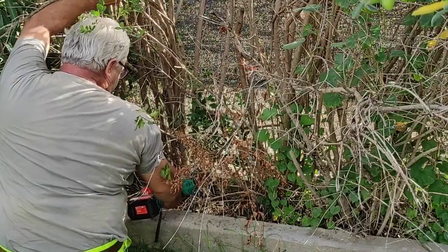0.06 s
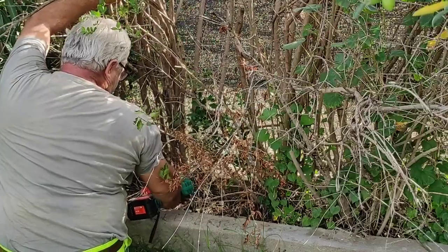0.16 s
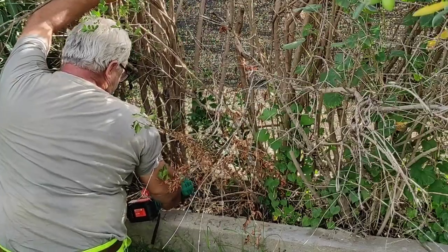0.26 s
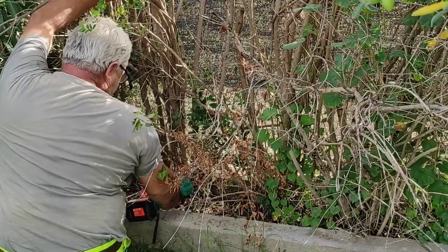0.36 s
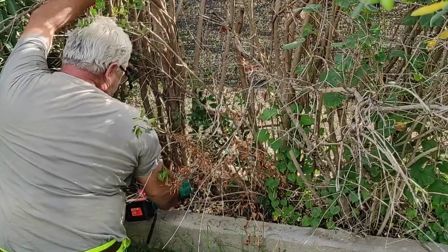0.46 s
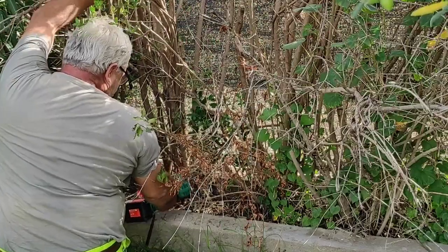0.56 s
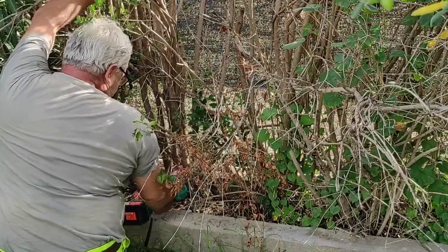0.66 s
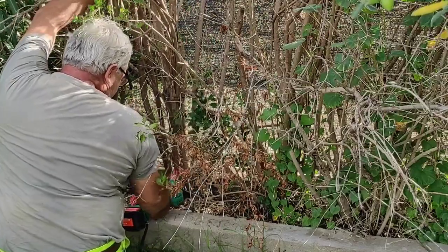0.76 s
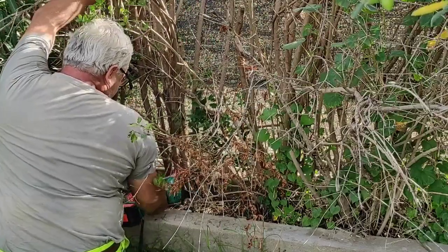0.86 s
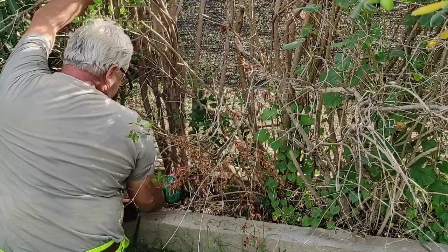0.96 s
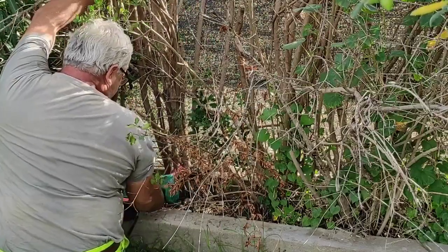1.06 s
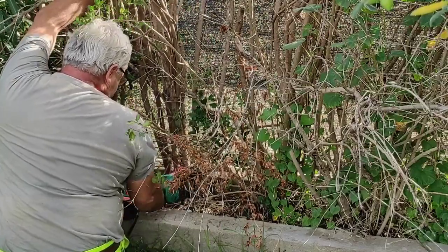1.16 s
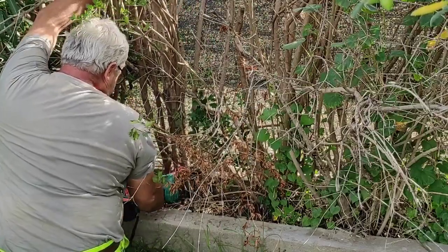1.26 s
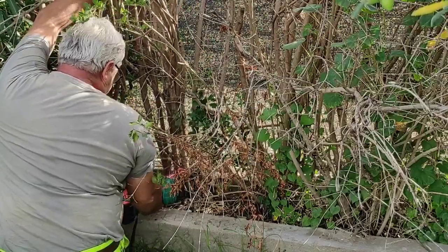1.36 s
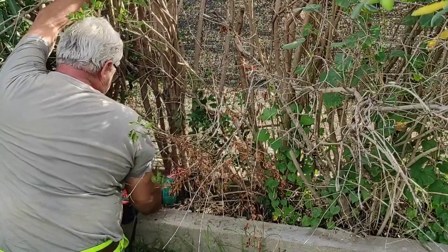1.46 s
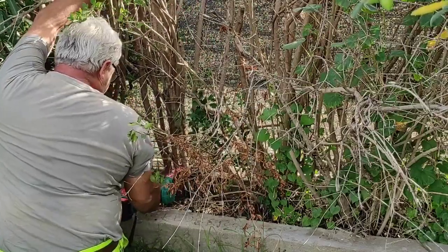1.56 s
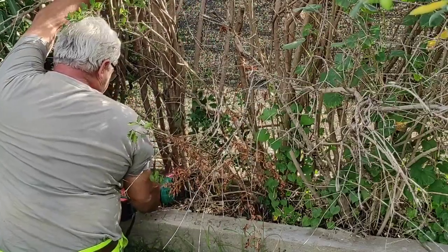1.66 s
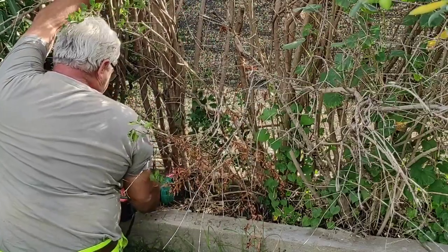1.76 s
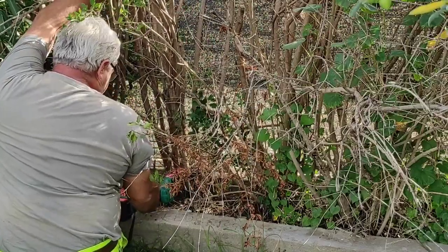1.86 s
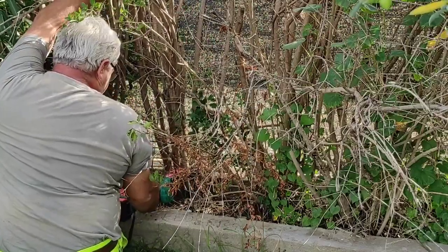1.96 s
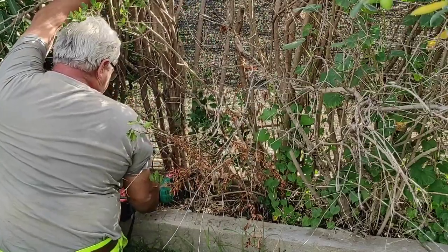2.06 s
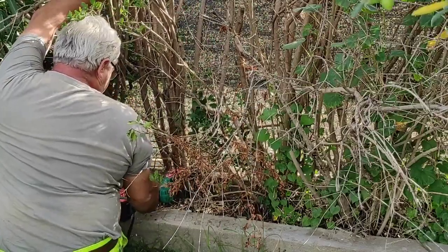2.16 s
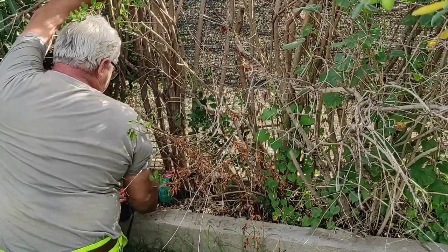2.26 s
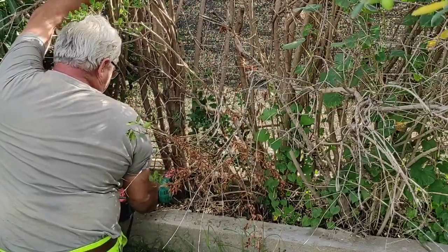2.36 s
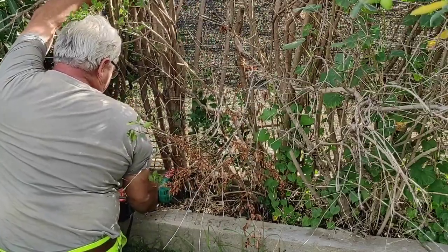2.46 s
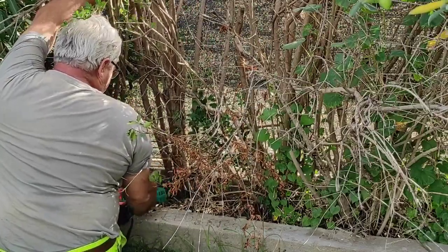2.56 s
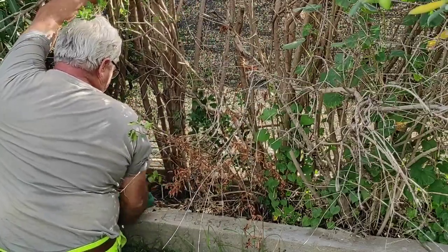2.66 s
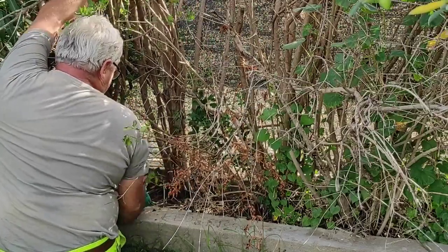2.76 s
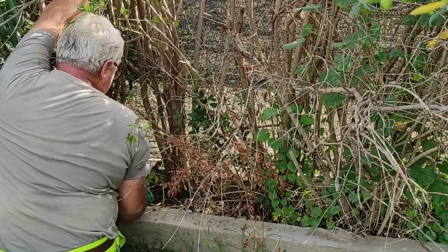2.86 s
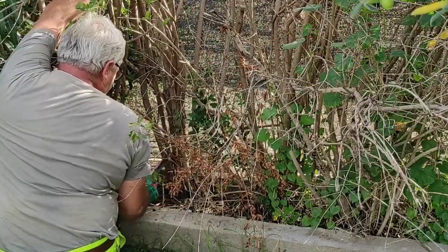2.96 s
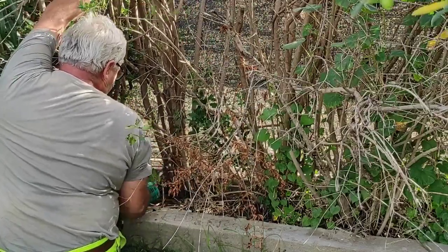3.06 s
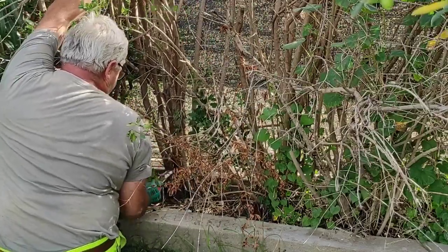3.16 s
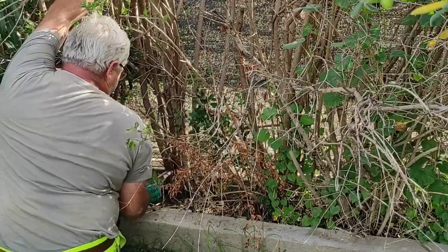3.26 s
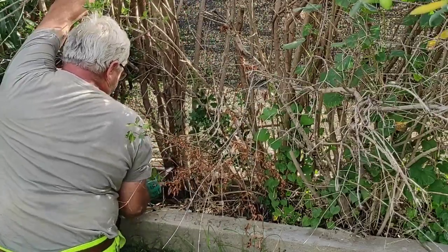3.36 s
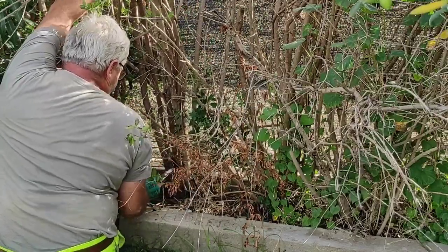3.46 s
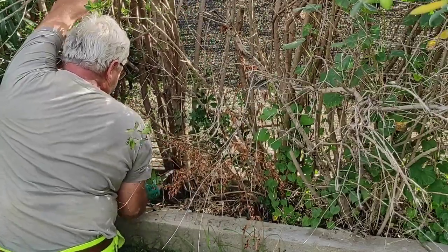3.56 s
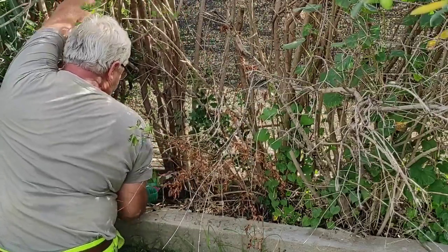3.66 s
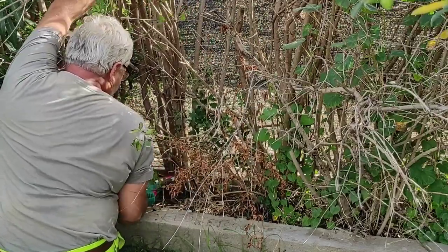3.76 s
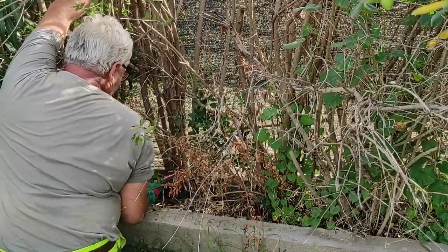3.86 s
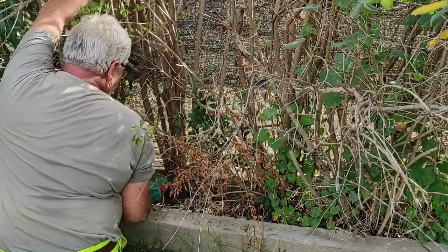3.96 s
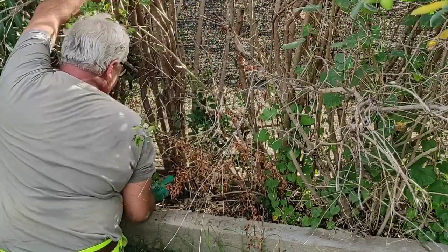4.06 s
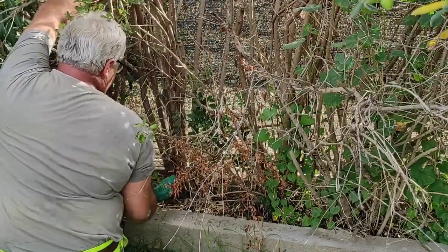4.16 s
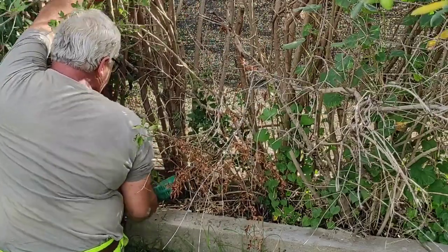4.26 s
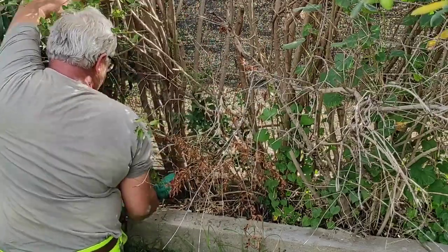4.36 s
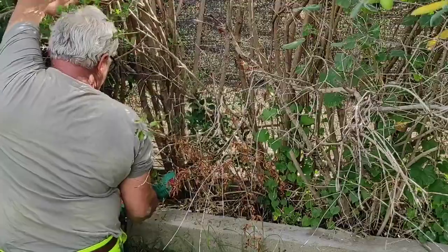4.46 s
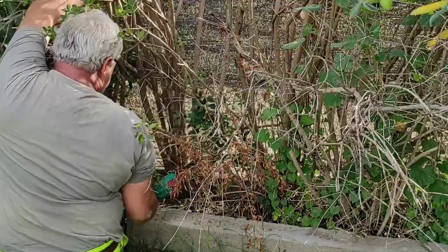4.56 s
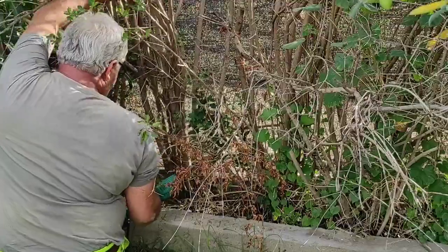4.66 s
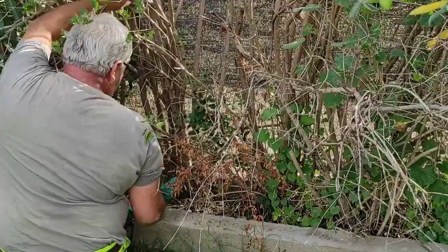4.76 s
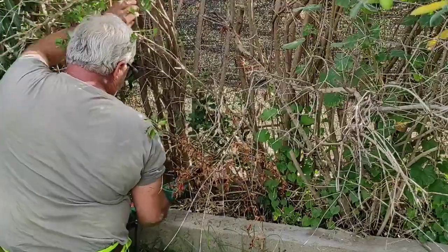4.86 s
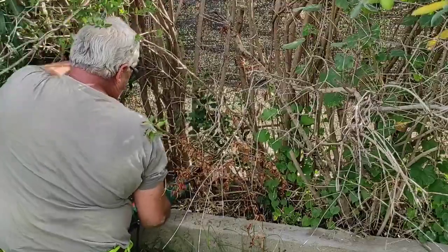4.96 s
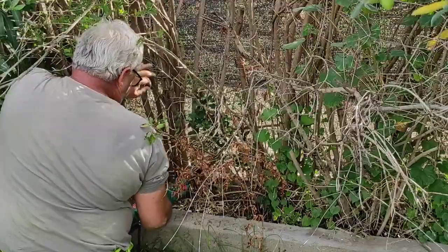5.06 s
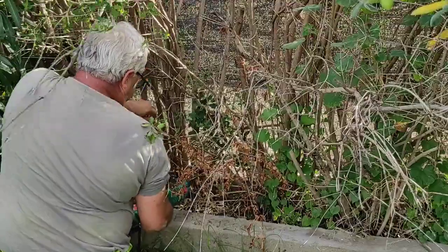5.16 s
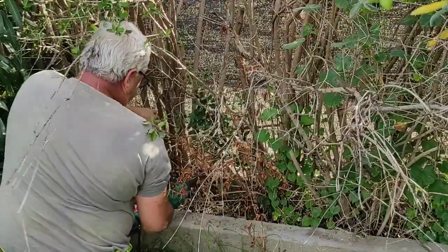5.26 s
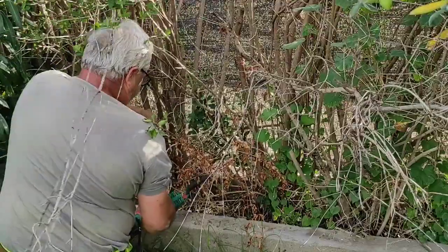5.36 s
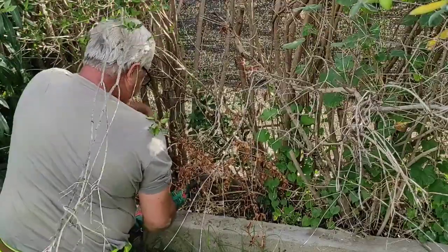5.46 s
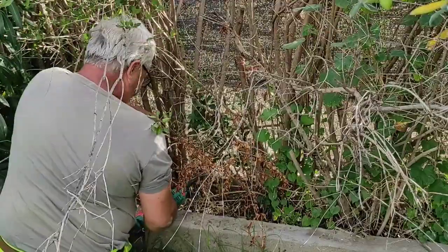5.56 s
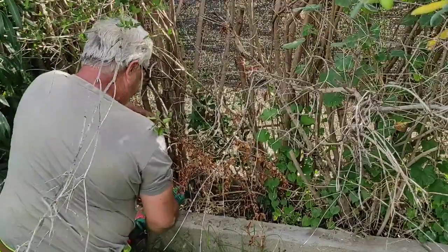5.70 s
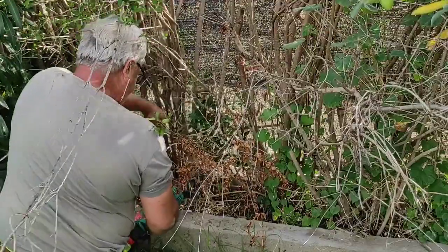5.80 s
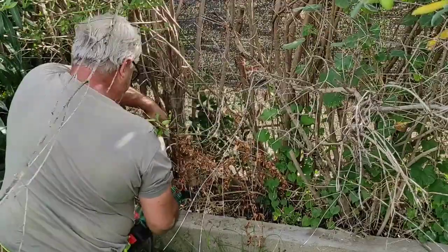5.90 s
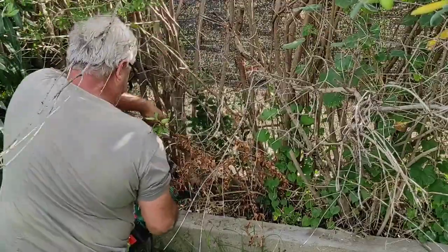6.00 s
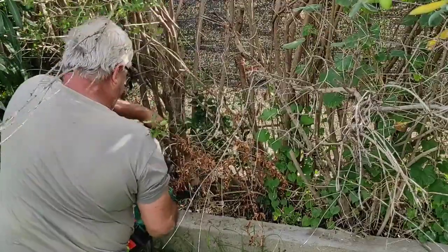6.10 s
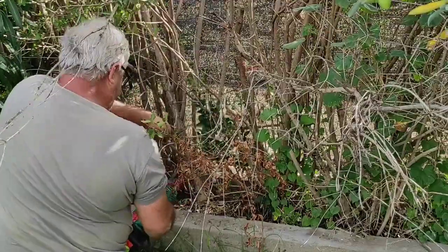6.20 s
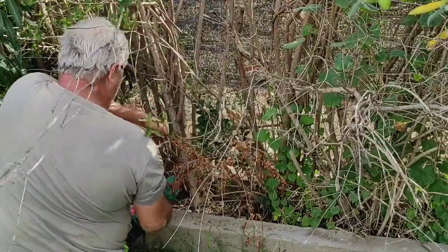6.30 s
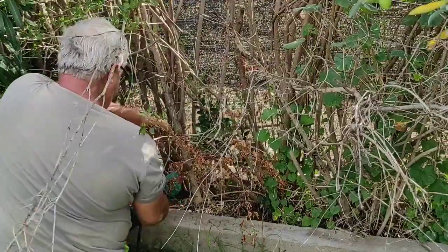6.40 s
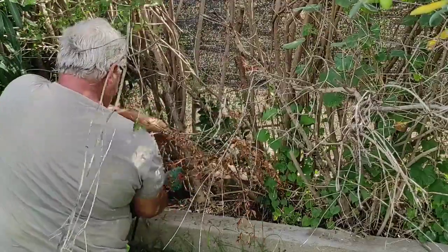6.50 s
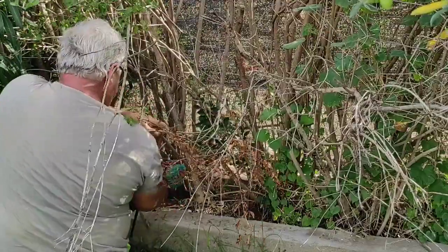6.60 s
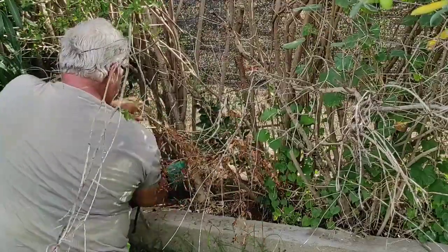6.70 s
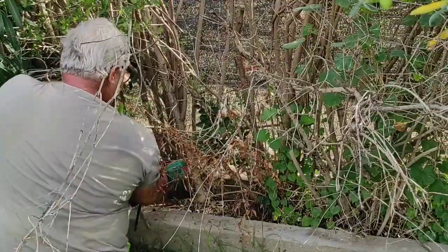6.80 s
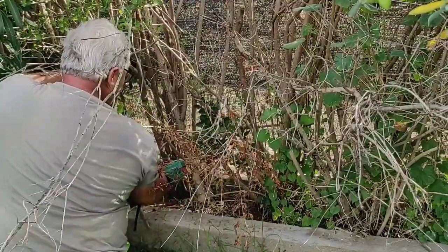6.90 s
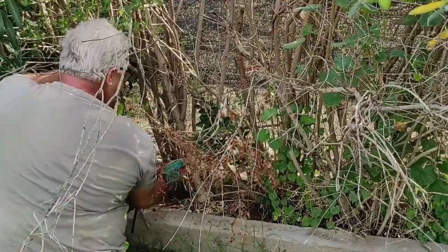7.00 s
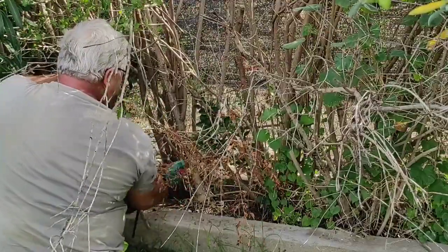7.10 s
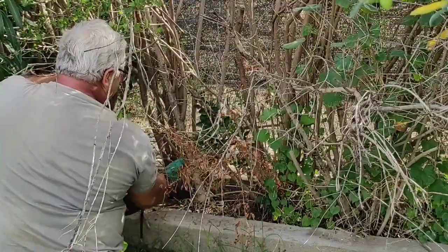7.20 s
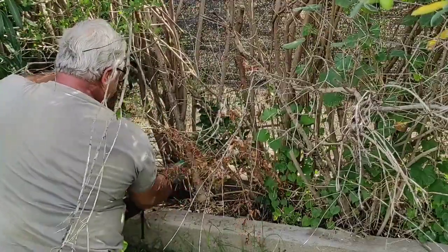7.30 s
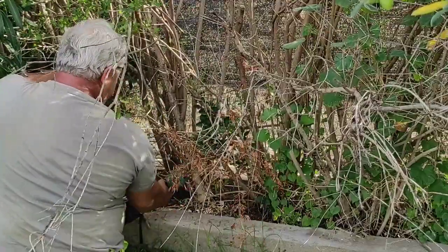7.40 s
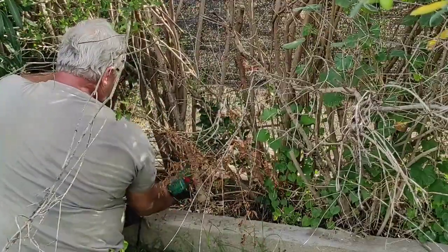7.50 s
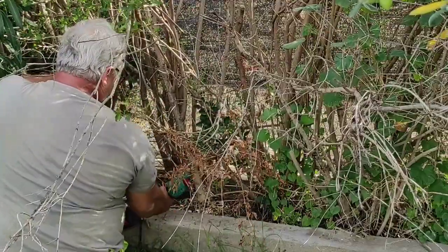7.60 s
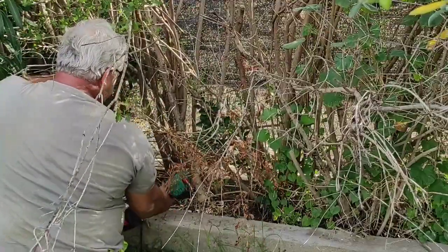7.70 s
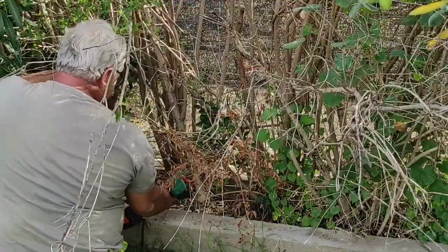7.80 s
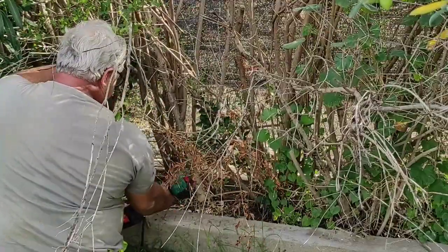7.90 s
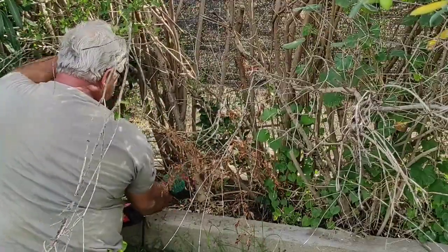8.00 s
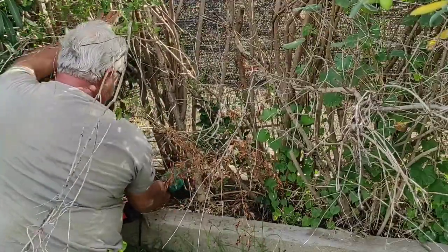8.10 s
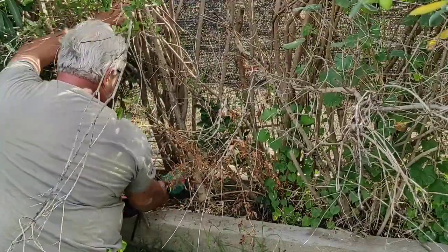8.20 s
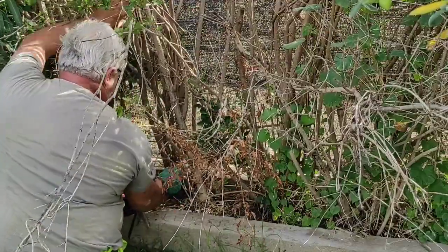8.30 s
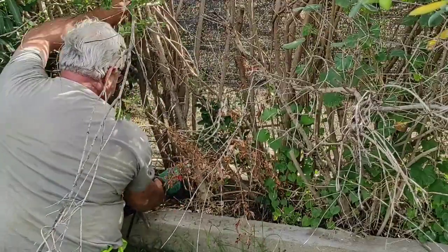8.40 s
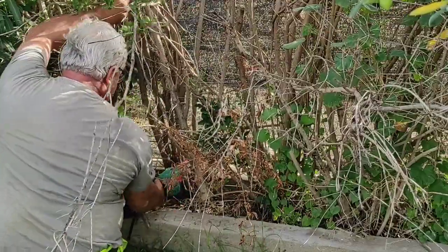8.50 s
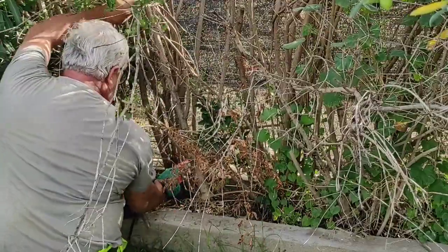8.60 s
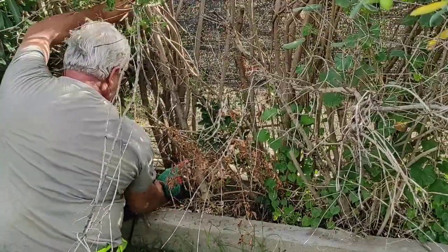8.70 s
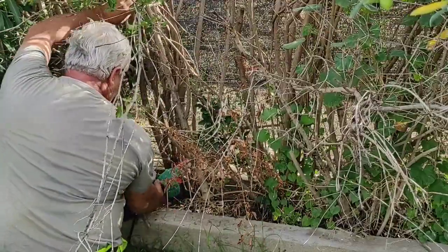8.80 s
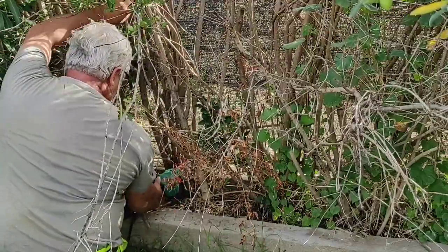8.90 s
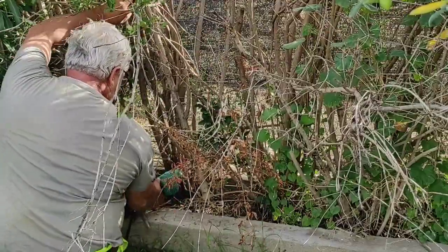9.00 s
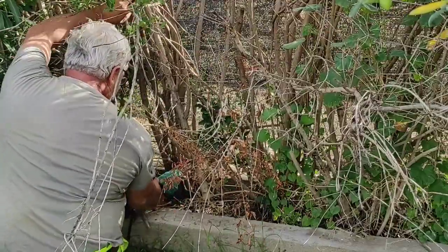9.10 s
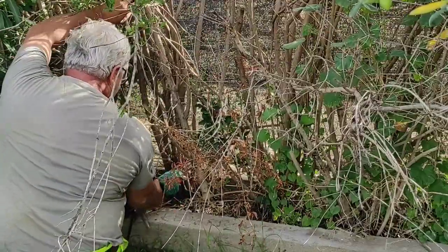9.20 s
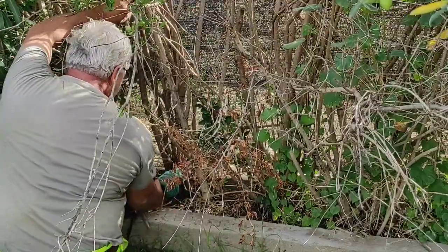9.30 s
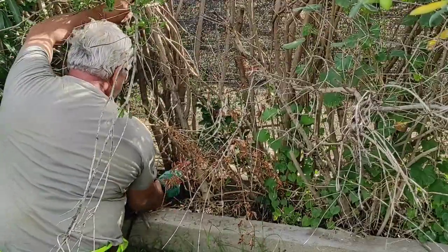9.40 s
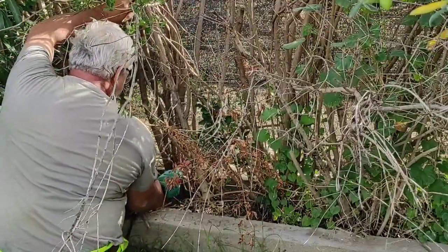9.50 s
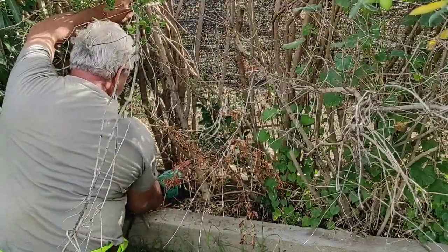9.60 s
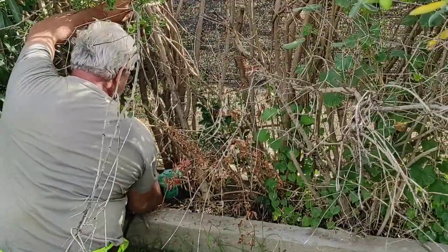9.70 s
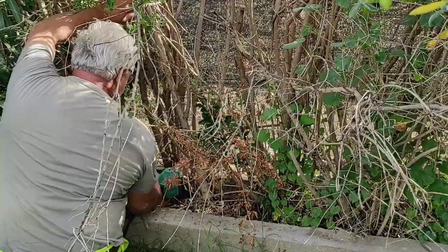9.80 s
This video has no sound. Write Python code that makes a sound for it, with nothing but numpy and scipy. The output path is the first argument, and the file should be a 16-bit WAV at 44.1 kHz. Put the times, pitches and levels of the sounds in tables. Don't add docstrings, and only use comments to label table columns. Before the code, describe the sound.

From 0 to 2.6 s a small battery chainsaw cuts a stem very close by: harsh, bright chain rattle, ringing plastic housing, wavering gear whine and rough wood tearing, with low throbs as it is pushed at the start, 0.5 and 2.3 s and brief dips when it slips. At 2.63 s it breaks through with clattering knocks, then runs free, thinner and smoother, until about 3.4 s, dropping quickly with ratcheting clicks and stopping by 4 s. From 4 to 9.7 s dry leaves rustle in flurries with scrapes, ticks, light knocks and twig snaps; the sharpest crack comes at 5.9 s, and handling thins after 8.7 s. Faint traffic, hum and soft breeze lie far beneath. At about 9.75 s clicks lead into the saw restarting, duller and cut short. The left is close, slightly distorted; the right is weak and muffled, with streaky gated gaps in the noise.

```python
import sys
import numpy as np
from scipy import signal
from scipy.fft import rfft, irfft, next_fast_len
from scipy.io import wavfile
from scipy.ndimage import uniform_filter1d

SR = 44100
rng = np.random.default_rng(int(sys.argv[2]) if len(sys.argv) > 2 else 0)


def level_to_linear(level):
    exponent = np.asarray(level, float) / 20
    return 10 ** exponent


def store_pcm(level_fs):
    pcm = np.round(np.clip(level_fs, -1, 1) * 32767).astype(np.int16)
    wavfile.write(sys.argv[1], SR, np.atleast_2d(pcm).T)


N = 434369

# start_s, links_per_s, gear_whine_db, load_roughness (0-1)
CHAIN_SPEED = [(0, 238, -26, 0.82), (.3, 237, -27, 0.8), (.45, 245, -31.5, 0.84), (.8, 206, -22.5, 0.64),
               (1.0, 260, -37, 0.59), (1.35, 225, -25.5, 0.69), (1.8, 210, -27, 0.85),
               (2.1, 210, -27.5, 0.74), (2.55, 214, -34.5, 0.67), (2.63, 254, -30.5, 0.45),
               (2.8, 283, -35, 0.15), (3.05, 275, -36, 0.06), (3.3, 296, -41, .2), (3.6, 114, -58, 0.57),
               (3.8, 47, -77, 0.6), (4.05, 10.4, -84, 0.36), (9.75, 28, -88, 0.32), (9.85, 150, -49, 0.61)]
# start_s, level_db
CHAIN_RUNS = [
    [(0, -10), (.46, -12), (.68, -9), (1.0, -14), (1.31, -12), (2.1, -10), (2.54, -11), (2.74, -20),
     (3.13, -19.5), (3.3, -21), (3.45, -24), (3.5, -28.5), (3.59, -26), (3.625, -35.5), (3.745, -37.5),
     (3.77, -42.5), (3.95, -49), (4.0, -61)],
    [(9.755, -80.5), (9.76, -50.5), (9.774, -43), (9.78, -35.5), (9.82, -32.5), (9.85, -29.5)],
]
HOUSING_RUN_DB = [-1, -4]
# pitch_hz, level_db (per Hz)
CHAIN_COLOUR = [(1650, -33.5), (2800, -7.5), (3230, -8.5), (4820, -5), (5250, -5.5), (6370, -1),
                (7570, -0.5), (8070, -2), (10100, -14), (14800, -17), (15500, -16.5)]
# pitch_hz, level_db (per Hz)
HOUSING_IN_WOOD = [(320, -50), (550, -18), (671, -4), (749, -7), (881, 0), (1190, 0), (1290, 3), (1540, -8),
                   (1790, -7), (1880, -6), (2090, -2.5), (2450, -4), (3200, -16.5), (4160, -32.5),
                   (7040, -120)]
HOUSING_IN_AIR = [(320, -50.5), (550, -22), (590, -18), (730, -12.5), (888, -2.5), (1060, -5.5),
                  (1230, 2.5), (1550, -8), (2160, -8.5), (2590, -7.5), (3600, -16.5), (4680, -39),
                  (7920, -120)]
# pitch_hz, width_hz, flutter_db
PANELS = [(685, 110, 2), (880, 140, 1.5), (1060, 130, 1.5), (1330, 110, 2), (2100, 170, 2.5),
          (2300, 200, 2)]
# pitch_hz, level_db (per Hz)
WOOD_COLOUR = [(18, -30.5), (30, -25.5), (146, -7), (220, -0.5), (422, -3.5), (461, -3), (516, -9),
               (600, -3), (780, -30.5), (1320, -120)]
# multiple of shaft turns, level_db (re gear whine)
SHAFT_LINES = [(2, -14), (3, -1.5), (4, 0)]
# start_s, length_s, level_db
PUSHES = [
    (0, 0.29, -28.5),
    (.5, 0.22, -27),
    (1.62, .1, -41.5),
    (2.3, 0.28, -33),
]
# start_s, length_s, loss_db
SLIPS = [(.2, 0.019, 0), (.42, .03, 4), (.63, 0.022, 3), (.72, .01, 2.5), (.94, .015, 2), (1.0, .03, 1),
         (1.038, .008, 7), (1.6, .008, 2), (1.73, .008, 3.5), (1.94, .012, 1), (2.105, .01, 3.5),
         (2.22, .008, 3.5), (2.32, .006, 1.5), (2.52, .006, 3), (2.605, .012, 6.5), (2.655, 0.018, 2.5),
         (2.713, 0.0046, 1.5), (3.08, .02, 0)]
# pitch_hz, level_db (per Hz)
GARDEN_COLOUR = [(12, -29.5), (20, 10.5), (49, -6), (120, -12.5), (175, -14.5), (229, -11.5), (363, -12),
                 (561, -19.5), (776, -18.5), (3260, -34.5), (7980, -33.5), (9910, -41), (13000, -62)]
# pitch_hz, width_hz, level_db
HUM = [(168, 20, -69.5), (363, 20, -68.5), (528, 30, -76.5)]
# start_s, length_s, level_db
BREEZE = [(0, 0.65, -54), (1.7, 0.4, -48), (2.3, 0.14, -53), (4.7, 0.11, -52), (5.45, 0.12, -52),
          (5.98, 0.056, -54), (6.27, 0.15, -44.5), (7.14, 0.03, -50), (7.3, .02, -47), (7.44, .1, -43.5),
          (7.85, .15, -52)]
# start_s, peak_db, t60_s, low_crack_db (re top)
BUCKS = [(2.5889, -4, 0.1, -15), (2.629, 2.5, 0.083, -13), (2.6858, -2.5, 0.071, -8),
         (2.7196, -2, 0.085, -11), (2.7999, -9, 0.081, -14), (3.4174, -6.5, 0.082, -11.5),
         (3.434, -5, 0.13, -20.5), (3.45, -8, 0.051, -19), (3.5362, -13.5, .05, -22),
         (3.592, -15.5, 0.055, -5), (3.5987, -2.5, 0.044, -2.5), (3.73, -22.5, 0.074, 0),
         (3.8, -22.5, 0.1, -5), (3.8603, -29.5, 0.081, -15.5), (3.9158, -23.5, .075, -23),
         (4.0088, -41, 0.066, -13), (9.744, -37, .02, -22), (9.7665, -31.5, .04, -9.5),
         (9.835, -19.5, .05, -12.5), (9.847, -16, 0.046, -12.5), (9.779, -24, 0.12, -5)]
# start_s, peak_db, t60_s, low_crack_db (re top)
SNAPS = [(4.03, -22, 0.12, -13.5), (4.3703, -36, .07, -21.5), (4.395, -30, 0.096, -23),
         (4.7942, -26.5, .07, -16), (5.0079, -33, 0.16, -7), (5.085, -28, 0.1, -10),
         (5.2284, -28.5, 0.057, -29), (5.2968, -31, 0.04, -15), (5.3053, -26, 0.17, -13),
         (5.897, -14, 0.021, -9), (5.903, -22, 0.054, -12), (5.4488, -26, 0.13, -16),
         (5.553, -21, 0.051, -17), (5.5729, -22.5, 0.052, -26), (5.8919, -1, 0.093, -24),
         (5.9577, -14.5, 0.17, -4.5), (6.032, -31, 0.073, -14.5), (6.3628, -27.5, 0.076, -19),
         (6.7312, -36, 0.11, -4), (6.777, -21.5, 0.13, -12.5), (6.8533, -18, 0.087, -11.5),
         (7.2035, -34.5, .06, -27), (7.3385, -24.5, 0.084, -22), (7.655, -34, .067, -27),
         (7.718, -37, 0.1, -20.5), (7.74, -33, .08, -9), (8.084, -25.5, 0.13, -27),
         (8.1883, -25.5, 0.25, -23), (8.286, -21.5, 0.18, -14.5), (8.4855, -21, .07, -25),
         (8.556, -25.5, 0.19, -17), (8.5622, -27, .02, -25), (9.044, -29.5, 0.13, -8),
         (9.078, -37, 0.052, -21), (9.3835, -46, .07, 2.5)]
# start_s, peak_db
TICKS = [(4.1885, -31.5), (4.4834, -37), (4.8616, -33), (5.261, -34), (5.374, -38), (6.1392, -37),
         (7.2702, -42), (7.425, -41.5), (7.582, -44.5), (7.791, -44.5), (7.974, -47), (7.997, -47.5),
         (8.026, -44), (8.863, -45), (8.945, -48.5), (8.978, -43), (9.555, -50), (4.53, -41.5),
         (5.995, -32), (6.055, -35), (8.141, -35), (8.2379, -37), (8.205, -32), (8.643, -39), (7.885, -49),
         (8.835, -52), (9.1436, -41), (9.241, -40), (4.5475, -36), (4.729, -39), (4.832, -36),
         (4.9825, -35.5), (5.025, -34), (5.0713, -33), (5.098, -31), (5.1496, -34.5), (5.214, -36),
         (5.239, -35), (5.278, -35), (5.413, -36), (5.523, -37), (5.7, -44), (5.706, -41), (5.818, -41),
         (5.835, -36.5), (5.8625, -30), (5.917, -31), (5.932, -17), (7.326, -40), (8.077, -36),
         (8.173, -45), (7.192, -42), (9.172, -50), (9.225, -50), (9.362, -49), (9.377, -48.5), (9.422, -50),
         (9.57, -53)]
# start_s, peak_db, ring_hz, t60_s
KNOCKS = [(2.634, -5, 850, 0.013), (3.858, -20, 4860, 0.0097), (3.865, -33, 7800, 0.043),
          (5.838, -35, 2026, 0.012), (6.853, -41, 677, 0.056), (7.115, -44, 900, .03),
          (4.037, -27, 2580, 0.045), (4.199, -33.5, 1300, 0.031), (4.237, -43, 1350, 0.05),
          (5.853, -35, 480, .012), (5.864, -29, 1900, .01), (5.867, -26, 604, 0.01), (5.879, -39, 500, .01),
          (5.898, -20, 1500, .015), (5.931, -24, 2300, .012), (5.935, -20, 1020, 0.014),
          (5.943, -32, 1000, .01), (5.964, -31, 1064, 0.04), (5.994, -34, 1740, 0.015),
          (6.244, -33, 2590, 0.053), (6.259, -32.5, 1680, 0.061), (6.777, -29, 2420, 0.05),
          (6.781, -37.5, 890, 0.044), (6.851, -22.5, 4020, 0.056), (7.087, -39.5, 820, 0.019),
          (4.53, -39, 1000, .02), (4.9, -41, 850, .02), (5.1, -38, 1700, .02), (5.31, -39, 2300, .02),
          (5.525, -41, 2300, .02), (4.04, -30, 7300, 0.028), (9.048, -33, 4700, .05),
          (8.19, -31.5, 660, 0.019), (8.27, -40, 1000, .06), (8.31, -46, 800, .06), (8.38, -45, 1000, .06),
          (8.45, -45.5, 1150, .06), (8.55, -48.5, 1000, 0.056), (7.573, -48, 1000, .02),
          (6.715, -42.5, 1010, .03), (6.335, -37.5, 1900, .015), (9.768, -30.5, 1000, .015),
          (9.799, -26, 720, .02), (9.831, -22.5, 850, .02), (9.838, -27, 900, .015),
          (7.339, -41, 1480, 0.046), (7.352, -40, 950, .04), (8.19, -26, 990, 0.02),
          (8.24, -33, 2410, 0.022), (8.644, -38.5, 2500, .01), (9.044, -25.5, 4740, 0.012),
          (9.387, -47, 2300, .015), (9.397, -43.5, 1136, 0.02), (9.216, -50, 5600, .05)]
BUMPS = [(3.86, -40, 200.7, .08), (3.885, -38, 259, 0.057), (3.95, -39, 201, .1), (3.98, -41, 150, 0.073),
         (8.26, -47, 258, 0.09), (2.629, -32, 124, 0.1), (3.6, -26, 313, 0.043), (3.601, -35, 132, 0.062),
         (5.571, -44, 170, 0.11), (5.855, -34, 168, 0.11), (6.328, -46, 102, 0.1),
         (6.402, -33.5, 269, 0.048), (6.41, -41.5, 320, .06), (6.793, -46, 170, 0.12), (7.3, -49, 60, 0.11),
         (7.519, -47, 80, 0.088), (7.649, -46, 277, 0.11), (8.186, -36.5, 168, 0.064),
         (8.637, -43.5, 176, 0.11)]
# start_s, leaf_level_db
RUSTLE = [(3.9, -52), (4.35, -58), (4.55, -47.5), (5.04, -49.5), (5.13, -47.5), (5.57, -52), (5.63, -59),
          (5.82, -57), (6.0, -53.5), (6.33, -48), (6.66, -57.5), (6.9, -56.5), (7.03, -64), (7.99, -73),
          (8.12, -54.5), (8.65, -59), (9.0, -66), (9.3, -82), (9.76, -72.5)]
# pitch_hz, level_db (per Hz)
LEAF_COLOUR = [(1470, -35.5), (2500, -15.5), (2740, -16.5), (3500, -15), (5530, -9), (7440, -2), (8730, -7),
               (10600, -17.5), (14100, -19.5), (15500, -23)]
# start_s, length_s, gain_db
SCRAPES = [(4.4, 0.069, 6), (5.09, 0.013, 8), (5.85, 0.081, 16.5), (6.24, 0.16, 7), (4.65, .2, 2.5),
           (6.52, .06, 5), (7.08, 0.039, 7.5), (7.33, 0.0204, 11), (7.405, 0.014, 13.5),
           (7.72, 0.031, 16.5), (8.07, 0.033, 7), (8.18, .02, 2), (8.27, 0.25, 7), (8.55, 0.023, 8.5),
           (9.1, .08, 11), (9.37, 0.039, 18.5), (9.72, 0.041, 12.5)]
# start_s, length_s, gain_db
BRUSHES = [(4.035, 0.0099, 5.5), (4.19, .01, 0), (5.3, .03, 1), (5.87, 0.1, 3.5), (6.73, 0.021, 3.5),
           (7.19, 0.018, 9), (7.41, 0.018, 0.5), (7.62, 0.028, 7), (7.82, .03, 5.5), (8.2, 0.045, 4.5),
           (8.9, 0.038, 5)]
# pitch_hz, loss_db
COVER_LOSS = [(60, 15.0), (110, 16.0), (200, 16.5), (380, 19.5), (700, 24.5), (1290, 26.5), (2380, 30.5),
              (4400, 40), (7600, 48), (11000, 39)]
COVERED_SIDE_LOSS = [(60, 8.5), (110, 16.5), (200, 15), (380, 16.5), (700, 14.5), (1290, 12), (2380, 6),
                     (4400, 6), (8120, 9.5), (15000, -8.5)]
# pitch_hz, level_db
DROPOUT_LEVEL = [(50, -23), (150, -21), (300, -29.5), (550, -22), (800, -17.5), (2000, -15.5), (4000, -10.5),
                 (6000, -9), (9000, -12), (11000, -14.5), (15000, -16.5)]


def colour(x, points, sign=1):
    hz, db = np.transpose(points)
    bins = np.arange(2049) * SR / 4096
    cep = irfft(sign * np.interp(np.log(bins + 1), np.log(hz), db) * np.log(10) / 20)
    cep[1:2048] *= 2
    cep[2049:] = 0
    return signal.oaconvolve(x, irfft(np.exp(rfft(cep))))[:len(x)]


def unit(x, lo_hz=20, hi_hz=20000):
    spec = rfft(x, next_fast_len(len(x)))
    bins = np.arange(len(spec)) * SR / 2 / len(spec)
    power = 2 * np.sum(np.abs(spec[(bins > lo_hz) & (bins < hi_hz)]) ** 2) / len(x) ** 2
    return x / np.sqrt(power)


def band(x, hz, width_hz):
    return signal.lfilter(*signal.iirpeak(min(hz, .45 * SR), hz / width_hz, SR), x)


def curves(table, off_db=-110):
    s, *cols = np.transpose(table)
    t = np.arange(N) / SR
    return [np.interp(t, s, cols[0], off_db, off_db)] + [np.interp(t, s, c) for c in cols[1:]]


def swells(events, rise_s, fall_s, rest_db):
    t = np.arange(0, N, 16) / SR
    lift = []
    for s, length_s, db in events:
        corners = np.cumsum([s - rise_s, rise_s, length_s, fall_s])
        lift.append((db - rest_db) * np.interp(t, corners, [0, 1, 1, 0]))
    return rest_db + np.interp(np.arange(N) / SR, t, np.max(lift, axis=0))


def walk(rate):
    k = max(int(SR / rate), 1)
    held = np.repeat(rng.standard_normal(N // k + 1), k)
    return 0.98 * uniform_filter1d(uniform_filter1d(held, k), k)[:N]


def clicks(rate, spread_db):
    size = level_to_linear(spread_db * rng.exponential(size=N)) * rng.standard_normal(N)
    return (rng.random(N) < rate / SR) * size


def noise():
    return rng.standard_normal(N)


def chain_rattle(drive):
    metal = drive * (noise() + .5 * unit(clicks(3000, 2.6)))
    return unit(colour(metal, CHAIN_COLOUR), 4000, 10000)


def housing_ring(drive, free):
    flutter = level_to_linear(0.76 * walk(30.04) + 1.3 * walk(200))
    shell = drive * flutter * (noise() + .6 * unit(clicks(1200, 1.6)))
    in_wood = unit(colour(shell, HOUSING_IN_WOOD))
    in_air = unit(colour(shell, HOUSING_IN_AIR))
    return np.sqrt(1 - free) * in_wood + np.sqrt(free) * in_air


def wood_tear(slap):
    tear = slap * level_to_linear(2.0 * walk(25)) * noise()
    wood = unit(colour(tear, WOOD_COLOUR), 140, 550)
    clear = swells([(2.9, .3, 0.89)], rise_s=.15, fall_s=.1, rest_db=0)
    return wood - 0.83 * clear * band(wood, 160, 160)


def panel_flutter(housing):
    for hz, width_hz, db in PANELS:
        gain = level_to_linear(db * walk(24)) - 1
        yield gain * band(housing, hz, width_hz)


def gear_whine(turns, rough):
    mesh_teeth, shaft_per_link = 9, 1.072
    shake = 2 * np.pi * turns
    mesh = mesh_teeth * shake + (0.6 + 2.6 * rough) * walk(150)
    whine = level_to_linear(2.5 + (1.5 + 2.5 * rough) * walk(40)) * (np.sin(mesh) + .5 * np.sin(2 * mesh))
    for k, db in SHAFT_LINES:
        level = level_to_linear(db - 6.0 * rough + 1.8 * walk(25))
        whine += level * np.sin(k * shaft_per_link * shake + 3.1 * rough * walk(90))
    return whine


def stem_shake(turns):
    shake = 1.03 * 2 * np.pi * turns
    level = level_to_linear(5.7 * walk(30))
    throb = np.sin(shake + 1.7 * walk(35))
    octave = 0.34 * np.sin(2 * shake + 1.1 * walk(30))
    return level * (throb + octave)


def saw():
    links, whine_db, rough = curves(CHAIN_SPEED)
    turns = np.cumsum(links * (1 + 0.038 * rough * walk(60))) / SR
    strike = level_to_linear(3.0 * rng.standard_normal(N // 100))[turns.astype(int)]
    slap = 0.75 + 0.56 * strike * np.exp(-(turns % 1) / 0.49)
    drive = slap * level_to_linear(1.0 * walk(12) + 1.0 * walk(45))
    t = np.arange(N) / SR
    free = np.clip((t - 2.63) / 0.019, 0, 1)
    chain = chain_rattle(drive)
    housing = housing_ring(drive, free)
    wood = wood_tear(slap)
    housing += sum(panel_flutter(housing))
    cancel = np.clip(0.46 + 0.25 * walk(8.8), 0, 1) * free * (t < 3.62)
    chain -= cancel * (band(chain, 3550, 270) + band(chain, 4080, 260))
    housing -= cancel * band(housing, 3550, 450)

    stem_rest_db = -50.5
    stem_db = swells(PUSHES, rise_s=0.061, fall_s=.06, rest_db=stem_rest_db)
    lean = (stem_db - stem_rest_db) / 20
    slip_db = swells(SLIPS, rise_s=0.012, fall_s=.004, rest_db=0)
    halvings = np.clip(np.log2(260 / links), 0, 4) * free
    housing_db = -5.5 - 1.0 * free + 3 * halvings + 0.5 * lean + 0.75 * walk(14) - 0.55 * slip_db
    bite_db = -27.5 - 7 * free + 7 * halvings + 2.5 * lean + 0.82 * walk(10) - .8 * slip_db
    out = level_to_linear(whine_db) * gear_whine(turns, rough)
    for run, run_db in zip(CHAIN_RUNS, HOUSING_RUN_DB):
        chain_db = curves(run)[0] - 0.79 * slip_db
        out += level_to_linear(chain_db) * (chain + level_to_linear(housing_db + run_db) * housing + level_to_linear(bite_db) * wood)
    return out, level_to_linear(stem_db - 3.5) * (1 - free) * stem_shake(turns)


def garden():
    wash = unit(colour(level_to_linear(1.0 * walk(3.3)) * noise(), GARDEN_COLOUR), 100, 13000)
    hum = sum(level_to_linear(db - 0.5 + 3 * walk(5.5)) * unit(band(noise(), hz, w)) for hz, w, db in HUM)
    rumble = signal.butter(2, [12, 70], "bandpass", fs=SR, output="sos")
    breeze = signal.sosfilt(rumble, level_to_linear(3.5 * walk(4.7) + 3 * walk(25)) * noise())
    puff_db = swells(BREEZE, rise_s=.1, fall_s=.2, rest_db=-55.5)
    return level_to_linear(-61) * wash + hum + level_to_linear(puff_db - 8.5) * unit(breeze)


def snaps():
    t = np.arange(6000) / SR
    top, low, tick = np.zeros((3, N + len(t)))
    strays = [(s, db, 0.08, -11) for s, db in TICKS]
    for s, peak_db, t60, low_db in SNAPS + BUCKS + strays:
        fade = np.exp(-np.log(1000) * t / np.clip(t60, .015, .2))
        opening = 1 - np.exp(-t / 0.00071)
        blow = level_to_linear(peak_db - 10.0) * opening * (0.85 * np.exp(-t / 0.0026) + 0.4 * fade)
        i = int(s * SR)
        top[i:i + len(t)] += blow
        low[i:i + len(t)] += level_to_linear(low_db + 3.0) * blow
        tick[int((s + .001) * SR)] = level_to_linear(peak_db - 1.5) * np.clip(0.072 / t60, 0, 1.5)
    bright = unit(colour(noise(), LEAF_COLOUR))
    ragged = level_to_linear(1.6 * walk(400))
    woody = unit(band(band(noise(), 1400, 4500), 2200, 5000))
    ping = colour(tick[:N], LEAF_COLOUR) / np.abs(colour(np.eye(1, 4096)[0], LEAF_COLOUR)).max()
    return ping + ragged * (top[:N] * bright + low[:N] * woody)


def knocks():
    t = np.arange(8000) / SR
    out = np.zeros(N + len(t))
    for s, peak_db, ring_hz, t60 in KNOCKS + BUMPS:
        push = rng.standard_normal(len(t)) * np.exp(-t * ring_hz / 4.2)
        width_hz = np.log(1000) / np.pi / np.clip(t60, .01, .3)
        ring = band(push, ring_hz, width_hz) + 0.13 * band(push, ring_hz, 0.43 * ring_hz)
        i = int(s * SR)
        out[i:i + len(t)] += level_to_linear(peak_db - 4.5) * ring / np.abs(ring).max()
    return out[:N]


def rustle():
    brush_db = swells(BRUSHES, rise_s=0.051, fall_s=0.028, rest_db=0)
    leaf_db = curves(RUSTLE)[0] + 1.5 * walk(9) + brush_db
    twig_db = swells(SCRAPES, rise_s=0.037, fall_s=.05, rest_db=0) - 8
    flurry = level_to_linear(0.83 * walk(14) + 1.4 * walk(60))
    tail = np.exp(-np.arange(400) / (.0015 * SR))
    grains = signal.fftconvolve(clicks(1500, .8), tail)[:N] * noise()
    leaves = colour(flurry * (noise() + 0.75 * unit(grains)), LEAF_COLOUR)
    other_grains = np.roll(grains, SR)
    twigs = band(level_to_linear(1.8 * walk(19)) * (noise() + 0.54 * unit(other_grains)), 1100, 3600)
    return level_to_linear(leaf_db) * (unit(leaves, 4000, 10000) + level_to_linear(twig_db) * unit(twigs))


def scene():
    tool, stem = saw()
    near = 2 * (tool + stem + rustle() + snaps() + knocks())
    smear = rng.standard_normal(5000) * np.exp(-np.arange(5000) / (0.027 * SR))
    around = signal.oaconvolve(near, smear / np.sqrt(np.sum(smear ** 2)))[:N]
    dull = signal.filtfilt(*signal.butter(1, 3200, fs=SR), near - around)
    leak = .62 * dull + .9 * around + 1.2 * stem
    muffled = colour(leak, COVER_LOSS, sign=-1)
    shaded = colour(2 * garden(), COVERED_SIDE_LOSS, sign=-1)
    return np.array([near + 2 * garden(), muffled + shaded])


def band_dropouts(x):
    window = np.sin(np.pi * (np.arange(2048) + .5) / 2048)
    hz, _, spec = signal.stft(np.pad(x, [(0, 0), (342, 0)]), SR, window, 2048, 1024)
    power = np.abs(spec) ** 2 + 1e-18
    loudest = power[:, (hz > 5000) & (hz < 9000)].mean(axis=1, keepdims=True)
    bands = power[:, :1024].reshape(len(x), 256, 4, -1).mean(axis=2)
    band_hz = hz[2:1024:4]
    wander_db = 7.7 * uniform_filter1d(rng.standard_normal(bands.shape), size=4, axis=-1)
    edge_hz, edge_db = np.transpose(DROPOUT_LEVEL)
    threshold_db = np.interp(np.log(band_hz), np.log(edge_hz), edge_db)[:, None]
    side_db = np.array([0, 8.5])[:, None, None]
    limit = loudest * level_to_linear(2 * (threshold_db + wander_db + side_db))
    limit += level_to_linear(2 * -95) * (band_hz[:, None] > 12900)
    keep = .01 + .99 / (1 + (limit / bands) ** 6)
    step = level_to_linear(2 * -0.5) * np.repeat(limit, 4, axis=1)
    spec[:, :1024] *= np.repeat(keep, 4, axis=1) / (1 + (step / power[:, :1024]) ** 4)
    return signal.istft(spec, SR, window, 2048, 1024)[1][:, 342:342 + N]


def top_cut(x):
    return signal.sosfilt(signal.butter(12, 15620, fs=SR, output="sos"), x)


def record(dry):
    top = level_to_linear(-2.5)
    x = level_to_linear(1.0) * dry / top
    flattened = top * x / (1 + np.abs(x) ** 4.9) ** (1 / 6.6)
    return top_cut(band_dropouts(flattened))


dry = scene()
out = record(dry)
store_pcm(out)
```